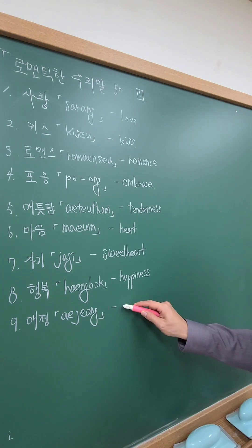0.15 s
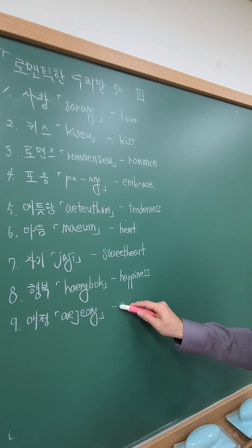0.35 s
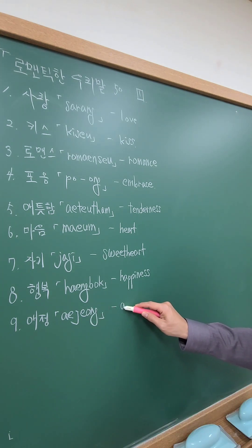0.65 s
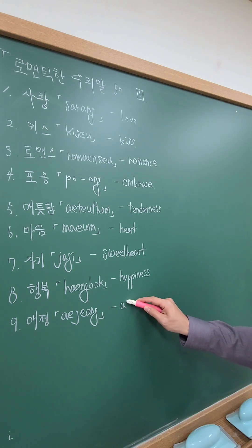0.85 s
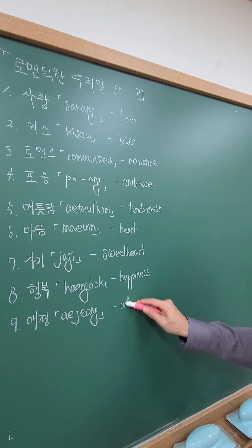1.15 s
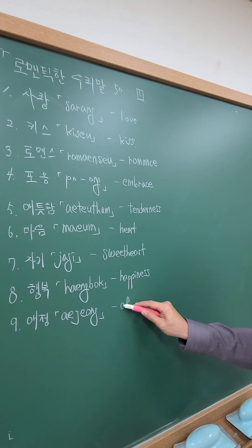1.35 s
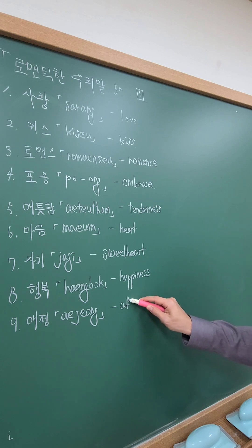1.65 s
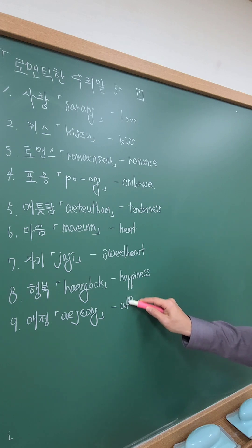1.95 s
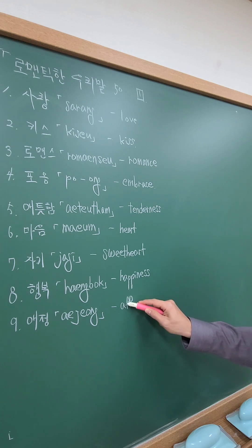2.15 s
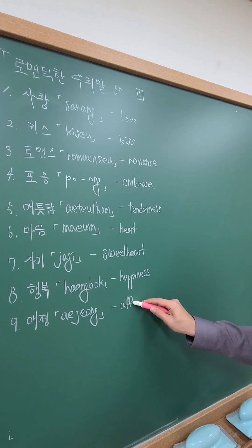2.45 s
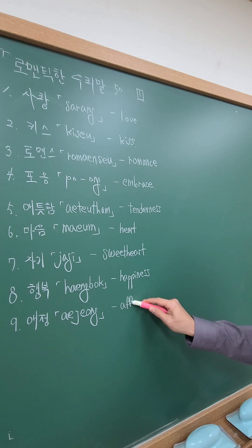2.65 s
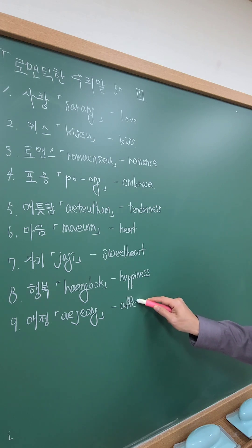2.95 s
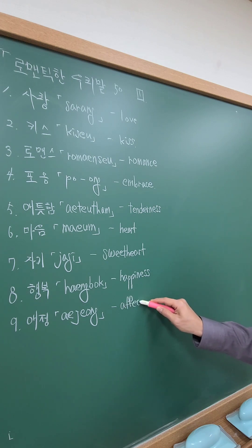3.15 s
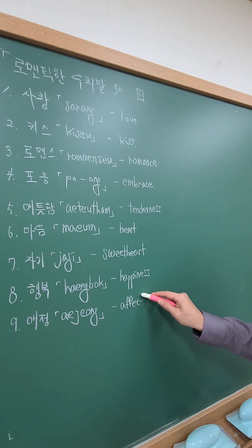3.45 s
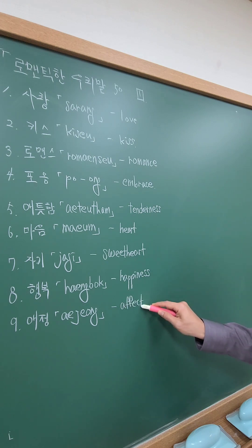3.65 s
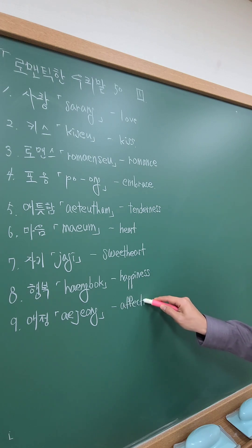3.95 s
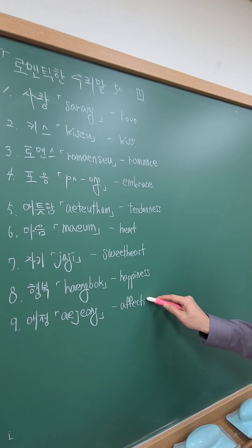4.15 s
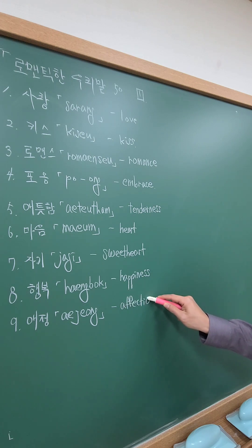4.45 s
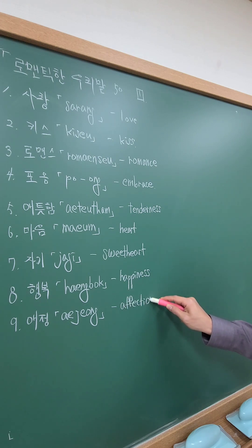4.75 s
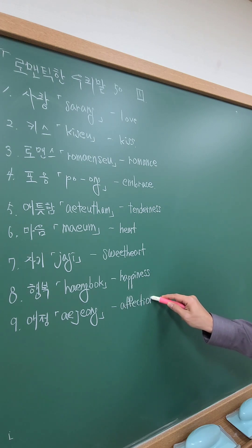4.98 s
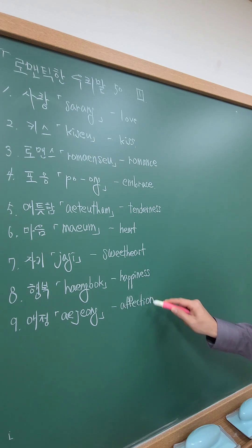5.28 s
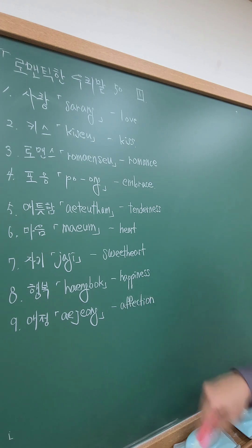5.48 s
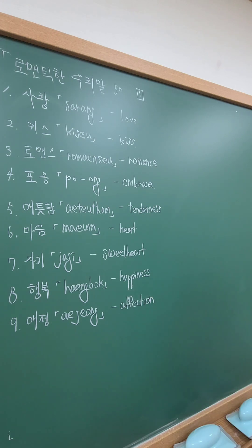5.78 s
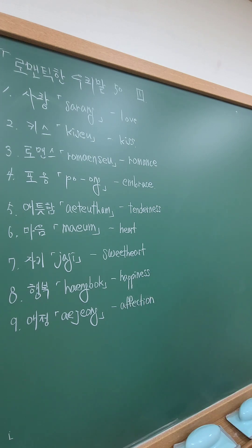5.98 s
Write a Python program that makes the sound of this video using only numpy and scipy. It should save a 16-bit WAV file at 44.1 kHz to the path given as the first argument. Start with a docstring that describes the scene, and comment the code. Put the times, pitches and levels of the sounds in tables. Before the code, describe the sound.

Chalk writes on a wall-mounted chalkboard about an arm's length from the microphone in a quiet classroom. About a dozen uneven taps land with a hollow thump of the panel and a small click of the stick, with soft scratchy strokes between them. Near the end come two light dry ticks and a very faint swish of a lowered arm. Low ventilation rumble and hum continue throughout.

```python
"""Chalk writes a word on a wall-mounted board, about an arm's length away in a quiet classroom.
Each landing thumps the panel, cracks the tip and makes the stick ring; each stroke drags the tip,
which crumbles in a soft hiss. Two dry ticks and the swish of a lowered arm close the word.
A bed of ventilation rumbles and hums underneath."""
import sys
import numpy as np
from scipy import signal
from scipy.fft import rfft, irfft, next_fast_len
from scipy.io import wavfile
from scipy.ndimage import uniform_filter1d, map_coordinates

SR = 44100
rng = np.random.default_rng(int(sys.argv[2]) if len(sys.argv) > 2 else 0)


def int16_out(signal):
    """Quantize to a 16-bit WAV file."""
    q = np.round(np.clip(np.atleast_2d(signal).T, -1, 1) * 32767)
    wavfile.write(sys.argv[1], SR, q.astype(np.int16))


N = 269654


def amp(db):
    """Decibels to gain."""
    return 10 ** (np.asarray(db) / 20)


def unit(x):
    """Scale to rms 1."""
    return x / np.sqrt(np.mean(x ** 2) + 1e-20)


def struck(x):
    """Scale a hit to rms 1 over its first 30 ms."""
    return x / np.sqrt(np.mean(x[..., :round(.03 * SR)] ** 2) + 1e-20)


def along(points, hz):
    """Read (frequency, value) points on a log axis."""
    f, v = np.transpose(points)
    return np.interp(np.log(hz + 1), np.log(f + 1), v)


def wobble(rate):
    """Smooth random modulation, rate knots a second."""
    return map_coordinates(rng.standard_normal(int(N * rate / SR) + 4), [np.arange(N) * rate / SR])


def filtered(x, response):
    """EQ x with a complex response of frequency."""
    n = x.shape[-1]
    m = next_fast_len(n + SR // 4)
    return irfft(rfft(x, m) * response(np.fft.rfftfreq(m, 1 / SR)), m)[..., :n]


def dulled(hz, corner_hz):
    """Two-pole low-pass: a longer contact carries less treble."""
    return 1 / (1 + 1j * np.sqrt(2) * hz / corner_hz - (hz / corner_hz) ** 2)


def add(track, s, sound):
    """Mix a sound into a track at s seconds."""
    part = track[..., max(round(s * SR), 0):][..., :sound.shape[-1]]
    part += sound[..., :part.shape[-1]]


# stereo image of diffuse sound: f/Hz, left-right correlation
CORRELATION = [(100, 0.95), (330, 0.65), (700, 0.1), (1500, 0.051), (12000, 0.066)]

def diffuse(spectrum, n):
    """Coloured stereo noise of rms 1, narrow in the bass and wide in the treble."""
    def mid_side_eq(hz):
        width = np.arccos(np.clip(along(CORRELATION, hz), -1, 1)) / 2
        return amp(along(spectrum, hz)) * [np.cos(width), np.sin(width)]
    mid, side = filtered(rng.standard_normal((2, n)), mid_side_eq)
    return unit(np.array([mid + side, mid - side]))


# fan motor partials: f/Hz, level/dB
MOTOR_HUM = [(59.2, -61), (118.4, -62.5)]
# EQ of the duct rumble: f/Hz, level/dB
RUMBLE_EQ = [(12, -38), (25, -9.5), (36, -4.5), (46, 5.5), (54, -5), (70, 0.5), (84, -8.5), (98, -17.5),
             (132, -5), (155, -12), (300, -23), (600, -74)]
# EQ of moving air: f/Hz, level/dB
AIR_EQ = [(120, 3), (200, -8), (350, 6), (600, 3), (1100, -0.5), (2100, -10.5), (3100, -8), (5000, -15.5),
          (7200, -18), (8300, -20.5), (9700, -22.5), (11000, -13.5), (16000, -13)]

def ventilation():
    """The bed: an unsteady motor hum, a slowly easing duct rumble and a thin hiss of air."""
    t = np.arange(N) / SR
    hum = sum(amp(db + 2.3 * wobble(5)) * np.sqrt(2) * np.sin(2 * np.pi * hz * t + .5 * wobble(2.78))
              for hz, db in MOTOR_HUM)
    eddies_db, ease_db_per_s = 1.3 * wobble(6), 0.5
    rumble = amp(-54.5 - ease_db_per_s * t + eddies_db) * diffuse(RUMBLE_EQ, N)
    air = amp(-64.5) * diffuse(AIR_EQ, N)
    swell = amp(1.5 * wobble(1.18))
    return swell * hum + rumble + air


# classroom reverb time: f/Hz, t60/s
ROOM_DECAY = [(150, 0.12), (400, 0.27), (1000, 0.38), (3000, 0.22), (7000, 0.16), (15000, 0.093)]

def in_room(x, wet_db):
    """Add the classroom's short reverb, whose treble dies first."""
    hz, t, noise = signal.stft(rng.standard_normal((2, SR // 2)), SR, nperseg=256)
    decay = amp(-60 * t / along(ROOM_DECAY, hz)[:, None])
    tail = signal.istft(noise * decay * (1 - np.exp(-t / 0.0032)), SR, nperseg=256)[1]
    wet = signal.fftconvolve(np.atleast_2d(x), tail / np.linalg.norm(tail[0]), axes=1)
    return x + amp(wet_db) * wet[:, :x.shape[-1]]


# resonances of the chalk stick in the fingers: f/Hz, level/dB
STICK_MODES = [(3020, -3.5), (3170, -3), (3446, 1), (3620, -2), (4020, -8)]

def stick(hz, width_hz=110):
    """The chalk stick as a bank of resonators of alternating polarity."""
    return sum((-1) ** k * amp(db) * 1j * hz * width_hz / (f * f - hz * hz + 1j * hz * width_hz)
               for k, (f, db) in enumerate(STICK_MODES))


def patchy(x, depth_db=-0.5):
    """The worn facet keeps changing, so the colour of the hiss shifts in patches."""
    bins = signal.stft(x, nperseg=512)[2]
    patches = uniform_filter1d(rng.standard_normal(bins.shape), size=4, axis=0)
    patches = uniform_filter1d(patches, size=10, axis=1)
    return signal.istft(bins * amp(depth_db * unit(patches)), nperseg=512)[1][:len(x)]


# drags of the chalk, cued near their middle: t/s, length/s, level/dB
STROKE_CUES = [(0.01, 0.078, -67.5), (0.476, 0.13, -62), (0.599, 0.092, -63), (0.746, 0.13, -67.5),
               (1.129, 0.094, -65.5), (1.271, 0.14, -58.5), (1.59, 0.099, -65.5), (1.926, 0.085, -62.5),
               (2.066, 0.15, -61.5), (2.376, 0.13, -67.5), (2.811, 0.25, -66.5), (3.137, 0.2, -67),
               (3.398, 0.11, -69), (3.709, 0.15, -61), (3.939, 0.067, -62.5), (4.187, 0.062, -69.5),
               (4.454, 0.34, -65), (4.889, 0.1, -63.5), (5.057, 0.2, -65.5)]
# the shifting grip retunes and damps the stick: t/s, pitch ratio, rasp trim/dB
GRIP_MOVES = [(.48, 1.035, 4), (.7, 1.03, 0), (1.301, 0.99, -0.5), (2.1, 1.015, -7.5), (3.2, 1, 1),
              (5.1, 1.024, -1.5)]
# EQ of the crumbling tip: f/Hz, level/dB
CRUMBLE_EQ = [(150, 6.5), (400, 11.5), (1000, -1.5), (2300, -6), (4500, -3.5), (6500, -1), (9000, -4.5),
              (11800, 2), (13500, -7.5), (16000, -5.5)]

def strokes():
    """The hand speeds up and slows in each stroke; grains break off faster and louder with speed."""
    t = np.arange(N) / SR
    grip_s, pitch, trim_db = np.transpose(GRIP_MOVES)
    envelope, speed = np.zeros((2, N))
    for s, length, db in STROKE_CUES:
        bell = np.exp(-np.abs((t - s + 0.0069) / (0.42 * length)) ** 2.4)
        speed += bell
        envelope += amp(db) * bell
    grain_rate = 4500 * (speed + 0.11)
    grains = (rng.random(N) < grain_rate / SR) * rng.standard_normal(N) * np.sqrt(SR / grain_rate)
    friction = grains * amp(1.5 * wobble(70))  # the tip bites unevenly
    crumble = unit(patchy(filtered(friction, lambda hz: amp(along(CRUMBLE_EQ, hz)))))
    # pressed on the board, the stick rings in wider bands
    rasp = patchy(filtered(friction, lambda hz: stick(hz, width_hz=220)))
    playhead = np.cumsum(np.interp(t, grip_s, pitch))
    rasp = unit(map_coordinates(rasp, [playhead], mode="wrap"))
    rasp_db = np.interp(t, grip_s, trim_db) - 2.5
    return in_room(envelope * (amp(1.5) * crumble + amp(rasp_db) * rasp), wet_db=-2)


# landings of the chalk: t/s, blow level/dB, stick ring trim/dB
TAP_CUES = [(0.331, -28, -11), (0.931, -27.5, 0), (1.494, -25, 5), (1.73, -24.5, -11), (2.286, -25, 0.5),
            (2.49, -28, -1), (3.021, -31, -3.5), (3.292, -36.5, -6), (3.596, -34, 0), (3.87, -28.5, 4),
            (4.1, -28, 1.5), (4.311, -27, 4), (4.768, -35, -2)]
# bending modes of the panel: f/Hz, level/dB, t60/s
PANEL_MODES = [(127.4, -11, 0.99), (179.6, -8, 0.61), (208, -16.5, 0.77), (236, -28, 0.14),
               (267, -16.5, 0.64), (296.4, -2, 0.4), (326, 2.5, 0.33), (339, 1, 0.36), (381, 1.5, 0.24),
               (394.8, -8.5, 0.65), (415.6, -3.5, 0.34), (443, -1.5, 0.21), (502, -4, 0.29),
               (520, -14.5, 0.36), (564, -13, 0.65), (588, -15, 0.39), (631, -3.5, 0.28), (682.5, -6, 0.28),
               (786, -19.5, 0.3), (858, -25, 0.39), (1022, -15, 0.54)]
# the panel yields around the tip and springs back at once: f/Hz, level/dB, t60/s
DENT_MODES = [(231.7, -12.5, 0.074), (314.4, 5, 0.025), (508, -2.5, 0.022)]
# EQ of the dense upper modes, blurred into a clatter: f/Hz, level/dB
CLATTER_EQ = [(100, -40), (200, -3), (380, 7.5), (650, -1), (850, -7.5), (1400, -13), (2100, -12),
              (3000, -20.5), (5000, -25), (9000, -23)]

def panel_thumps():
    """Each landing dents the panel and starts all its modes; they beat as waves return from the frame."""
    out, t = np.zeros((2, N)), np.arange(round(.7 * SR)) / SR
    hz, mode_db, t60 = np.transpose(PANEL_MODES)[:, :, None]
    spread = rng.normal(0, 1.0, (2, *hz.shape)) * hz / 1000  # higher modes sit wider in stereo
    modes = amp(mode_db - 60 * t / t60) * np.sin(2 * np.pi * hz * t + spread) * (1 - np.exp(-t / 0.006))
    dent = sum(amp(db - 60 * t / life) * np.sin(2 * np.pi * f * t) for f, db, life in DENT_MODES)
    dent *= 1 - np.exp(-t / 0.0013)
    clatter_decay = amp(-60 * t / 0.33) + 0.064 * amp(-60 * t / 0.027)
    for s, db, _ in TAP_CUES:
        ring = (modes * amp(rng.normal(0, 0.6, hz.shape))).sum(axis=1)  # each spot favours other modes
        clatter = struck(diffuse(CLATTER_EQ, len(t)) * clatter_decay)
        # a gentle landing stays in contact longer and so sounds duller
        clatter = filtered(clatter, lambda f: dulled(f, 4200 * amp(0.51 * (db + 31))))
        clatter_db = -15 + 0.56 * (db + 29)  # firm blows rattle more
        add(out, s + 0.001517, amp(db) * (amp(clatter_db) * clatter - amp(0.5) * dent - amp(-15) * ring))
    low_cut_hz = 175  # air slips around the panel, so it radiates little bass
    return filtered(out, lambda f: (f / low_cut_hz) ** 2 * dulled(f, low_cut_hz))


# EQ of the cracking tip: f/Hz, level/dB
CRACK_EQ = [(800, -14), (2400, 2.5), (4000, 7), (6500, -0.5), (8000, -1), (11000, -1), (16000, -12)]

def tip_hits():
    """The tip cracks on landing and chatters for a few milliseconds, which sets the stick ringing."""
    out, t = np.zeros((2, N)), np.arange(SR // 2) / SR
    usual_blow_db = -27.5
    for s, blow_db, trim_db in TAP_CUES:
        force_db = blow_db - usual_blow_db
        ring_db = -49 + 1.7 * force_db + trim_db  # a harder blow rings and cracks far more
        crack_db = -52.5 + 2.8 * force_db
        contact = signal.unit_impulse(len(t)) + 0.4 * rng.standard_normal(len(t)) * amp(-60 * t / 0.0072)
        pitch = 1 + 0.015 * rng.standard_normal()  # each landing retunes the stick a little
        ring = filtered(contact, lambda hz: stick(hz / pitch) * dulled(hz, 3800))
        ring = struck(in_room(ring, wet_db=-7))
        corner_hz = 12000 * amp(0.59 * (crack_db + 43.5))  # harder cracks are brighter
        noise = rng.standard_normal(len(t))
        crack = filtered(noise, lambda hz: amp(along(CRACK_EQ, hz)) * dulled(hz, corner_hz))
        crack = struck(in_room(crack * amp(-60 * t / 0.04), wet_db=-2.5))
        add(out, s + 0.001963, amp(ring_db) * ring + amp(crack_db) * crack)
    return out


# light ticks that leave the panel still: t/s, level/dB, low-pass f/Hz
TICK_CUES = [(5.182, -54.5, 15000), (5.606, -65, 3520)]

def ticks():
    """Small snaps with a short gritty tail, as when the tip flicks off."""
    out, t = np.zeros(N), np.arange(SR // 4) / SR
    snap, tail = 5 * amp(-60 * t / .007), amp(-60 * t / 0.27)
    for s, db, corner_hz in TICK_CUES:
        grit = filtered(rng.standard_normal(len(t)), lambda hz: hz / (hz + 1500) * dulled(hz, corner_hz))
        add(out, s, amp(db) * struck(grit * (snap + tail)))
    return in_room(out, wet_db=-5)


def sleeve():
    """A faint airy swish as the arm drops from the board."""
    t = np.arange(N) / SR
    peak_s, half_length_s = 5.71, 0.26
    return amp(-67) * np.exp(-((t - peak_s) / half_length_s) ** 2) * diffuse(AIR_EQ, N)


# shading of a source on the right: f/Hz, left minus right level/dB
PAN_EQ = [(1200, 0), (3000, -3.5), (6000, -10), (9000, 2.5), (13000, -17)]

def scene():
    """The mix: the chalk sits to the right, so it reaches the left microphone later and duller."""
    lag_s, side = 5 / SR, np.array([[.5], [-.5]])
    chalk = panel_thumps() + tip_hits() + ticks() + strokes()
    pan = lambda hz: amp(side * along(PAN_EQ, hz)) * np.exp(-2j * np.pi * hz * lag_s * side)
    return filtered(chalk, pan) + sleeve() + ventilation()


# treble dip from the hollow of the microphone ports: f/Hz, level/dB
MIC_EQ = [(7200, 0), (8000, -8.5), (9500, -9.5), (11000, -6)]

def record(dry):
    """Microphone colour and a brick-wall high cut."""
    return filtered(dry, lambda hz: amp(along(MIC_EQ, hz)) * (hz < 15800))


dry = scene()
out = record(dry)
int16_out(out)
```